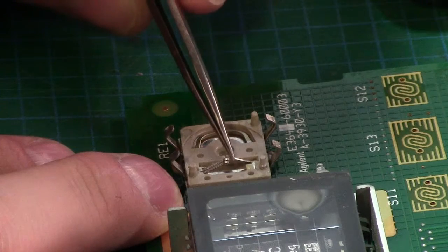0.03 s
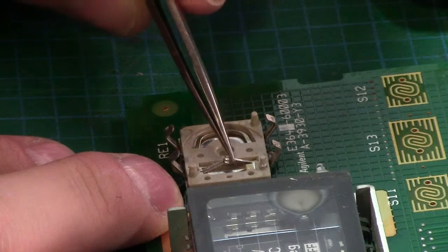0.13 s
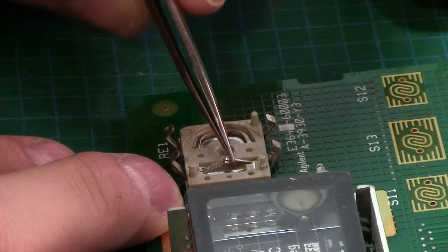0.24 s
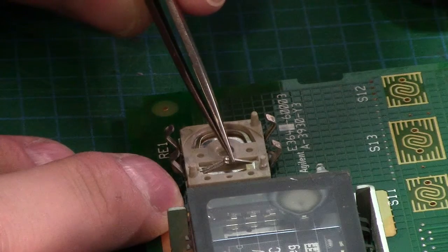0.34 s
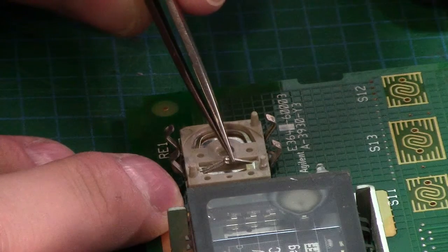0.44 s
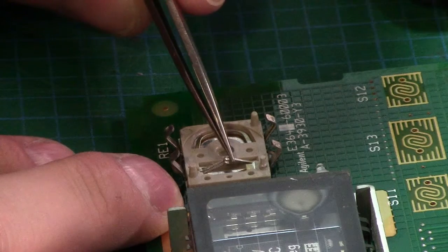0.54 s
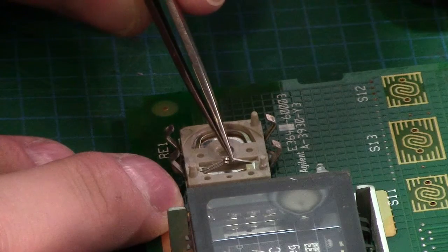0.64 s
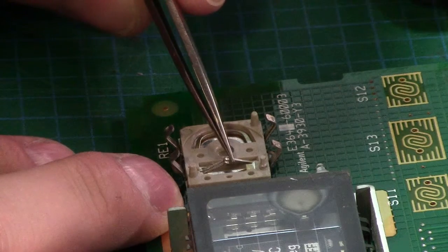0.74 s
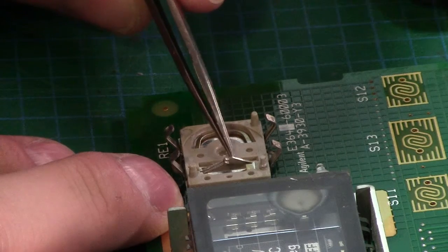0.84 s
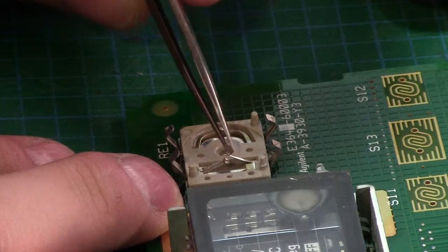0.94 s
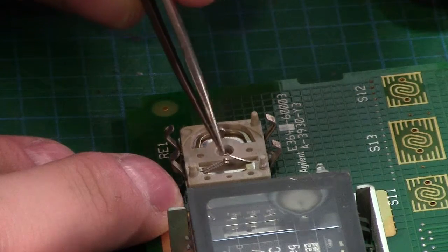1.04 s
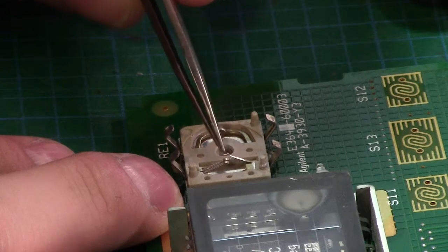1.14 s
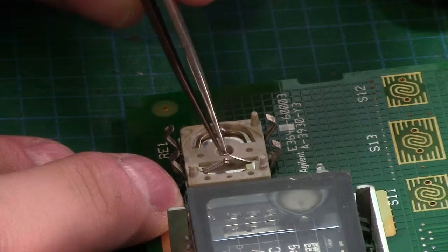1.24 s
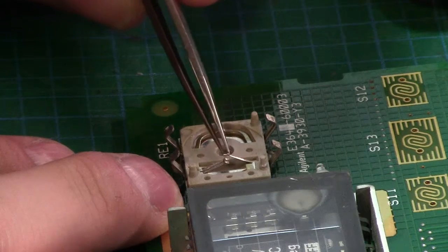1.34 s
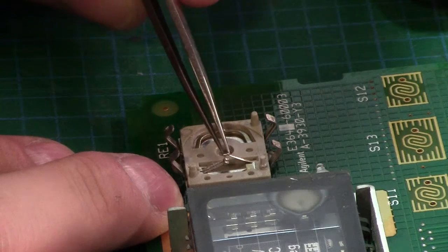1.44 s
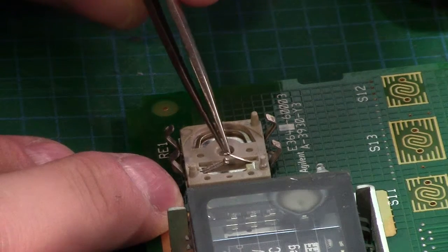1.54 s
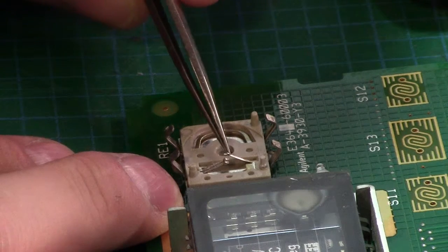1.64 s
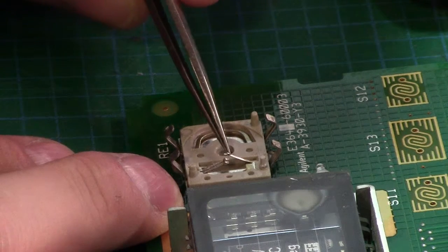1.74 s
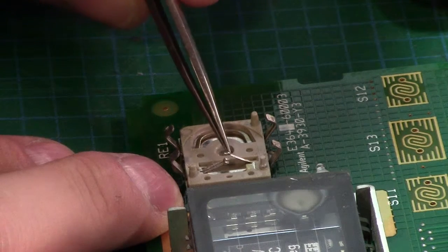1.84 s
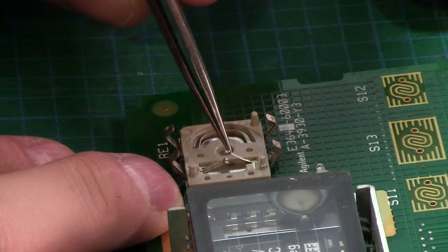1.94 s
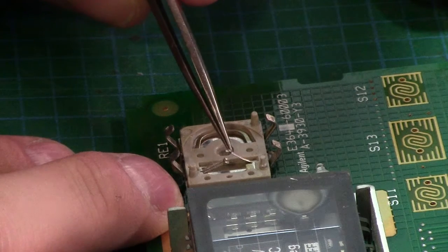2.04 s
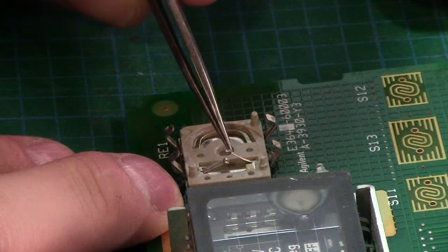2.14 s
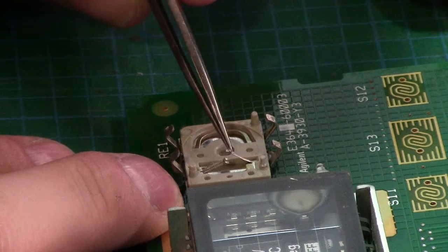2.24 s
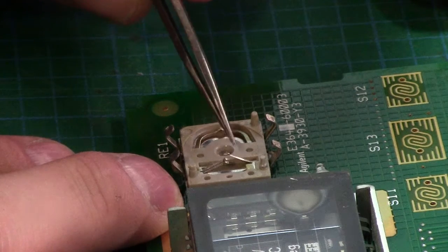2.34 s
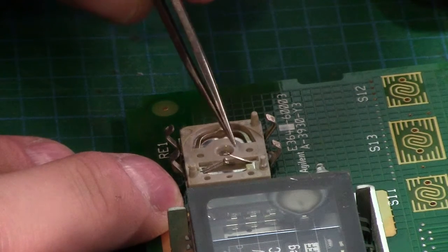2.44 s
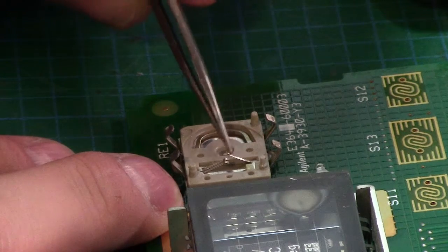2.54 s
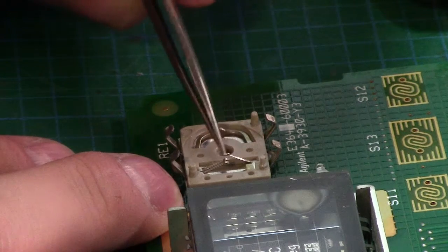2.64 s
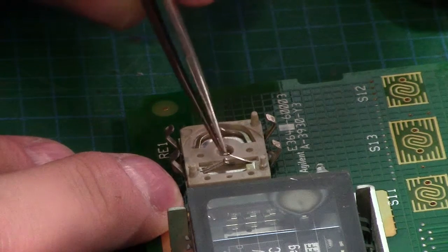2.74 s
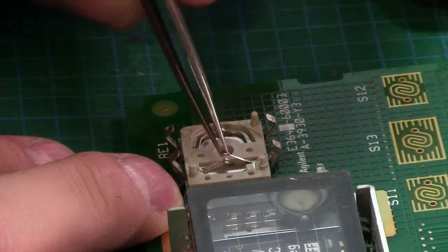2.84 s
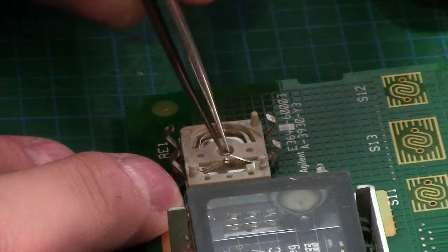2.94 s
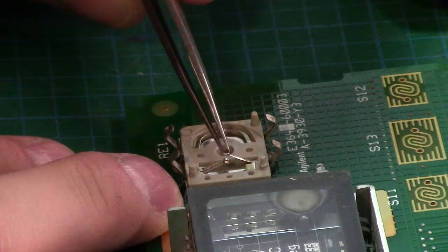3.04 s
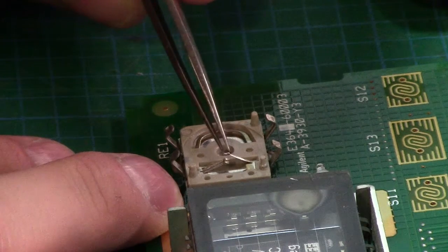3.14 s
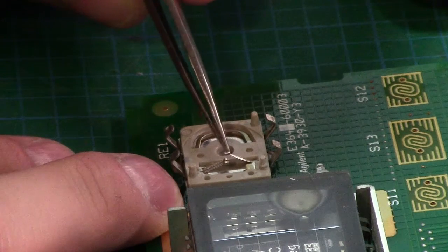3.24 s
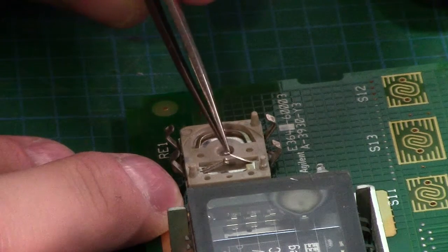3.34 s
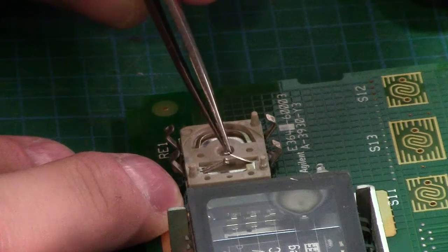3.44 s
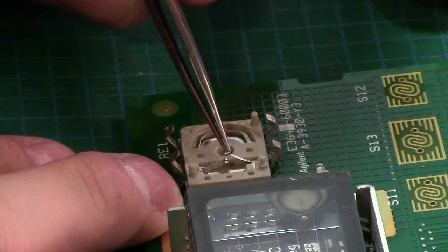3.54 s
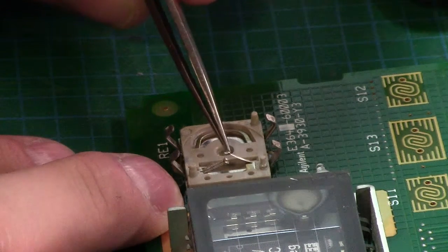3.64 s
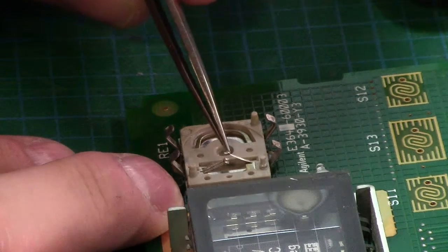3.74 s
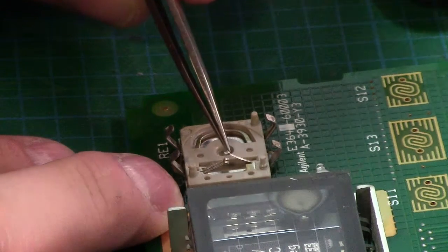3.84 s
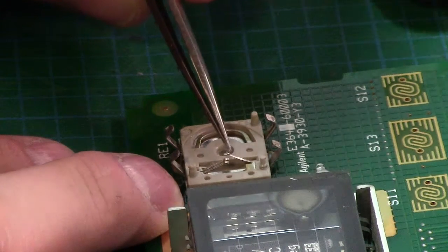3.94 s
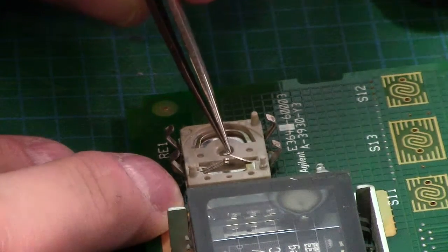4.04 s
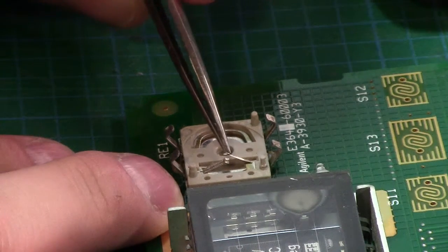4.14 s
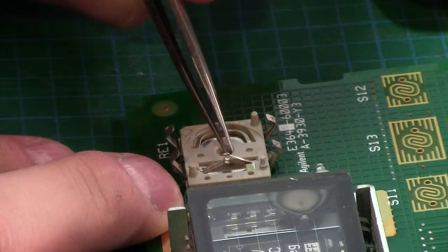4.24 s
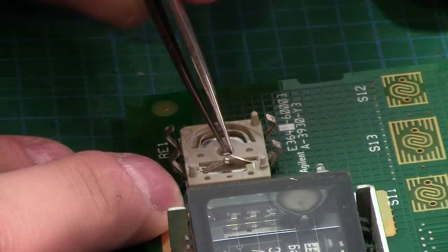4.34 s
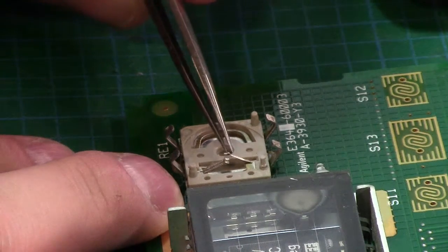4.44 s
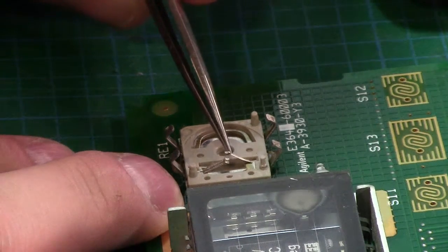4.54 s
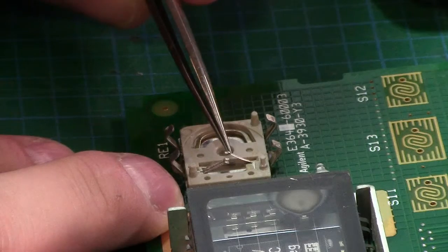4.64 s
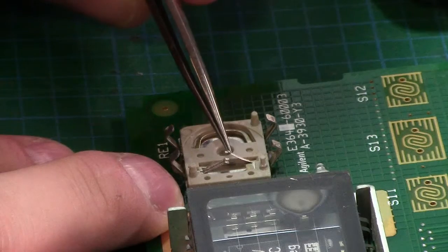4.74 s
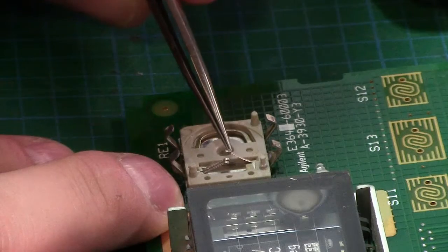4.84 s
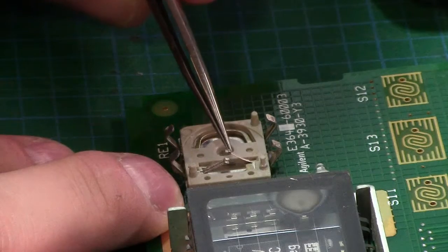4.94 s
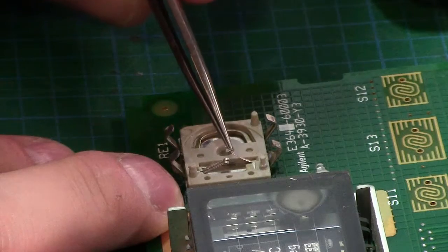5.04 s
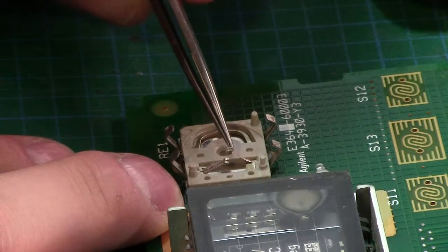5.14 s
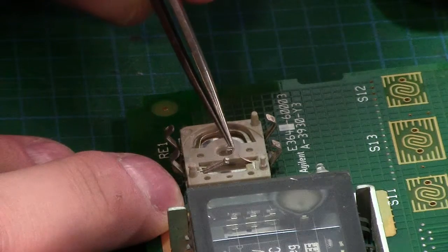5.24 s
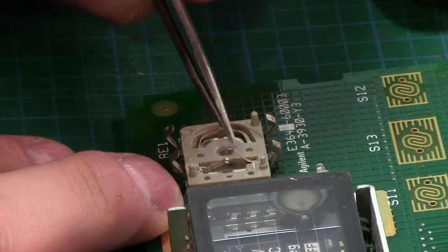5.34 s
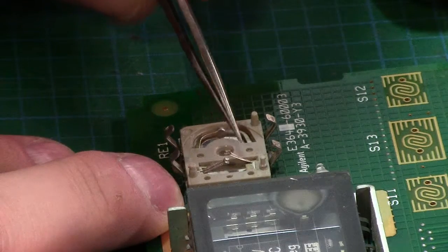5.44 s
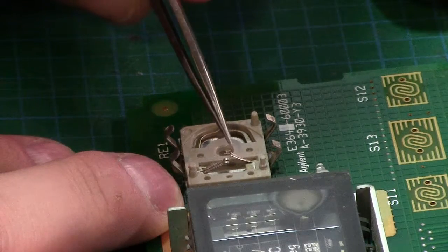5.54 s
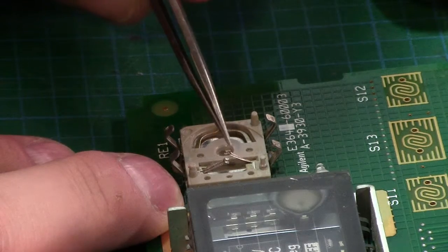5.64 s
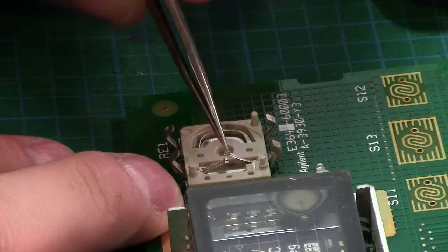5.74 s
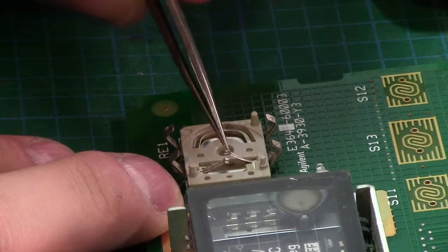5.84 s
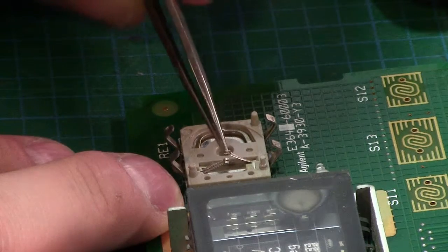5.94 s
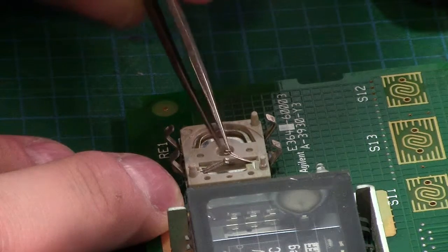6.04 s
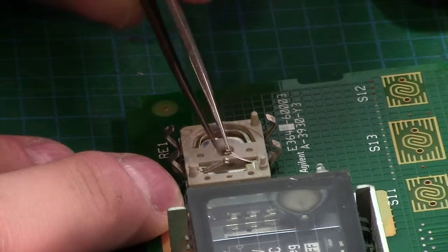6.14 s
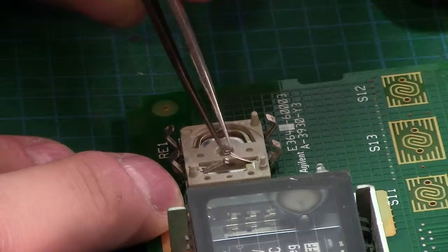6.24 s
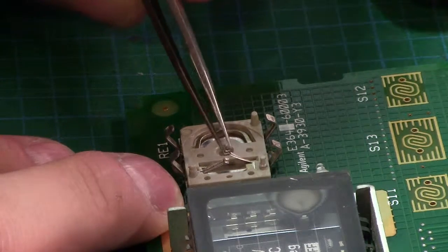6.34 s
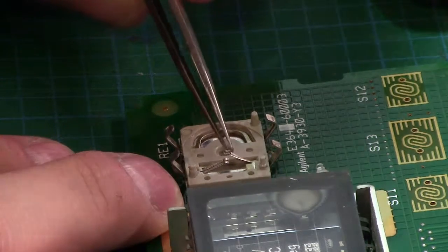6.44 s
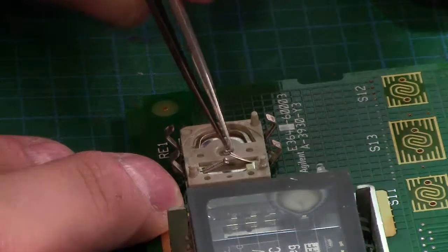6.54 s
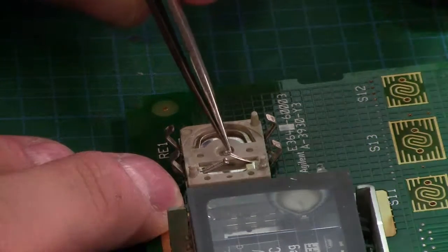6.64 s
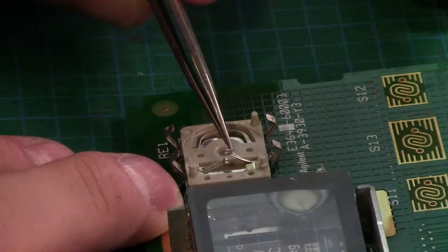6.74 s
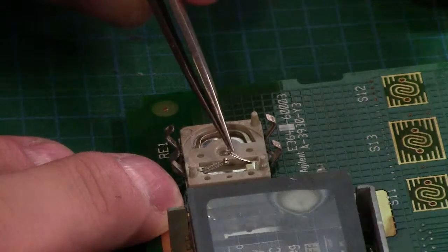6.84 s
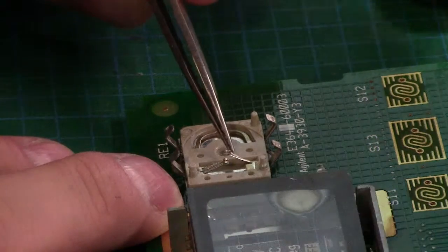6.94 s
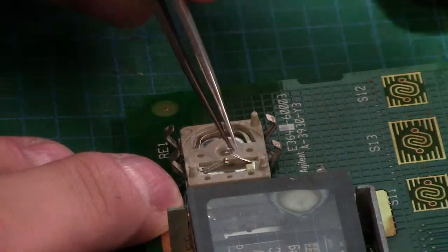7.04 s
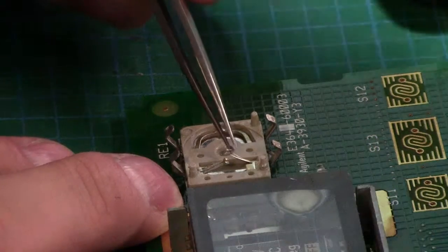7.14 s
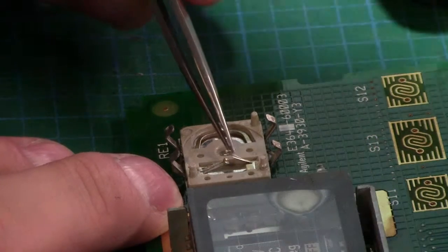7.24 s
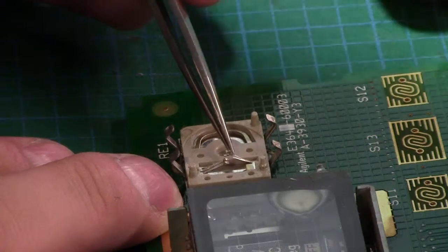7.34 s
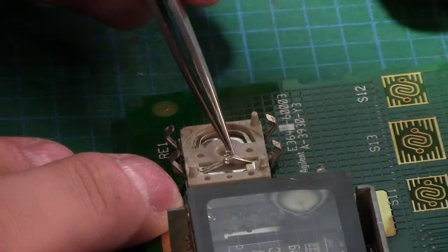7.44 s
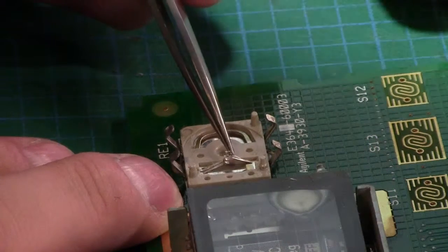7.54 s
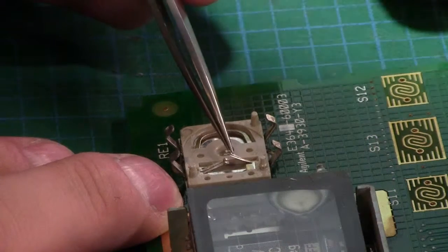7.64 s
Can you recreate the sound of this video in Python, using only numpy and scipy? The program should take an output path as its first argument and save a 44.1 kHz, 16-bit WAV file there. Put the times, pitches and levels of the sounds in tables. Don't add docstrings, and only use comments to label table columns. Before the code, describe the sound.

Very close in a small room, fine steel tweezers work at tiny contact springs on a circuit board. After a second of steady fan hum come faint ticks, then a hard, bright snap with a quick rebound, a smaller click, scattered tiny touches, another loud snap as the spring comes free, and finally a weak slanting click.

```python
import sys
import numpy as np
from scipy import signal
from scipy.io import wavfile
from scipy.ndimage import uniform_filter1d

SR = 44100
rng = np.random.default_rng(int(sys.argv[2]) if len(sys.argv) > 2 else 0)


def unload_audio(sound):
    columns = np.transpose(np.atleast_2d(sound))
    steps = np.round(np.clip(columns, -1, 1) * 32767)
    wavfile.write(sys.argv[1], SR, steps.astype(np.int16))


def magnitude_from_level(level_db):
    exponent = np.asarray(level_db, float) / 20
    return 10 ** exponent


N = 339248

# frequency in Hz, width in Hz,
# level in the snap in dB, level of the ring-on under the snap in dB.
FREE = [(2174, 91, -18, -43.5), (2700, 640, -15.5, -48), (3420, 300, -14, -47), (4400, 600, -13, -46),
        (5190, 220, -7.5, -38), (6260, 200, -13, -64.5), (7200, 380, -8.5, -54), (8700, 340, -8, -60),
        (10020, 430, 0.5, -46), (12660, 220, -6, -50), (13500, 350, -17, -60), (14400, 380, -19, -56),
        (15620, 300, -30, -41)]
REBOUND = [(3260, 1100, -8, -50), (5220, 260, -6, -32), (6800, 210, -3, -38), (8450, 450, -8, -50),
           (10500, 700, -6, -38), (12300, 350, 0, -45)]
HELD = [(2280, 720, -22.5, -30), (4400, 300, -17, -50), (5130, 270, -17.5, -50), (6050, 220, -12, -50),
        (6660, 180, -12.5, -50), (8250, 340, -5.5, -36), (9200, 600, -4, -50), (10150, 230, -5, -42),
        (11060, 440, -5, -50), (12500, 330, -22, -55), (13700, 350, -15, -55), (14600, 450, -6, -40),
        (15800, 400, -16, -50)]
SLANT = [(2230, 390, -11, -35), (3580, 240, -8, -18), (4380, 220, -6, -45), (5300, 220, -3.5, -37),
         (6100, 290, -1, -47), (7200, 300, -2, -36), (8500, 190, -6, -50), (10400, 340, 7, -36),
         (13700, 550, -6, -40)]
FLICK = [(2050, 190, -23.5, -57), (3470, 320, -12.5, -56), (4050, 280, -12.5, -60), (5040, 340, -17.5, -46),
         (7200, 150, -8, -55), (9730, 380, -2.5, -47), (11300, 480, -10, -58), (12600, 320, -1, -42),
         (14130, 350, -10, -55), (15660, 500, -4.5, -44)]


def snaps(beat_hz=55.4, treble_loss=0.2, twin=0.79):
    # start in seconds, peak in dB, modes of the grip, broad crack in dB, ring-on t60 in seconds.
    strong_slips = [
        (2.3073, -3, FLICK, -9, .36),
        (2.3177, -13.5, REBOUND, -4.5, 0.097),
        (2.3215, -20, REBOUND, -1, .18),
        (2.9269, -17.5, HELD, -7, 0.11),
        (5.4006, -2.5, FREE, -1, 0.23),
        (6.2262, -21.5, SLANT, -7, .16),
    ]
    quickest_ms, slower_ms_per_db = 0.092, 0.04
    out = np.zeros(N)
    t = np.arange(12000)[:, None] / SR
    for start, peak_db, grip, crack_db, t60 in strong_slips:
        hz, width, mode_db, arm_db = np.transpose(grip)
        rise_ms = quickest_ms + slower_ms_per_db * abs(crack_db)
        body = rings(hz, width, mode_db, rise_ms, size=1500)
        add(body, rise_ms / 1000, magnitude_from_level(crack_db) * crack())
        force = slip(2.1, size=300)
        add(out, start, magnitude_from_level(peak_db) * peaked(np.convolve(force, body)))

        apart_hz = beat_hz * np.sqrt(hz / 5000)
        arm = np.sin(2 * np.pi * hz * t)
        other_arm = -twin * np.sin(2 * np.pi * (hz - apart_hz) * t)
        spring = 0.35 * twin * np.sin(2 * np.pi * (hz + 1.7 * apart_hz) * t)
        fade_db = -60 * t / t60 * (hz / 5000) ** treble_loss
        ring_on = magnitude_from_level(peak_db + arm_db + fade_db) * (arm + other_arm + spring)
        fade_in = np.minimum(t[:, 0] / 0.0018, 1)
        add(out, start, ring_on.sum(axis=1) * fade_in)
    return out


def ticks(width=300.0, rise_ms=.25, spring_db=4.0, crack_db=9.5):
    # start in seconds, peak in dB, tip ring in Hz, spring and crack in dB.
    touches = [(1.04, -44, 9250, -14), (1.0499, -38, 9200, -8), (1.054, -28, 9200, 0),
               (1.0558, -32, 6150, -11), (1.068, -42, 11000, -8), (1.082, -41, 10000, -8),
               (1.0955, -39, 11000, -2), (1.0553, -35, 13500, -3), (1.457, -37, 11000, -2),
               (1.4575, -40, 6250, -8), (2.3, -38, 9200, 1), (3.066, -46, 9600, -14),
               (3.0695, -48, 9500, -8), (3.0937, -32, 9500, -12), (3.094, -38, 6300, -16),
               (3.107, -48, 6400, -3), (3.39, -48, 8000, -1), (3.4072, -40.5, 10600, -7),
               (3.533, -42, 9900, -6), (3.555, -35.5, 9900, -3), (3.5575, -40, 7500, -4),
               (3.565, -50, 7460, -16), (3.9434, -28.5, 10600, -11), (3.9449, -35, 6200, -17),
               (3.9443, -34.5, 5300, -13), (3.945, -40, 4300, -10), (5.3985, -31, 7140, 0),
               (5.83, -47, 9000, -2), (7.074, -43, 6400, -18)]
    out = np.zeros(N)
    hz, spring_width, mode_db, _ = np.transpose(HELD)
    spring = rings(hz, spring_width, mode_db, rise_ms, size=600)
    for start, peak_db, tip_hz, broad_db in touches:
        tip = rings(np.array([tip_hz]), width, 0, rise_ms, size=600)
        body = tip + magnitude_from_level(broad_db + spring_db) * spring
        add(body, rise_ms / 1000, magnitude_from_level(broad_db + crack_db) * crack())
        force = slip(0.89, size=200)
        add(out, start, magnitude_from_level(peak_db) * peaked(np.convolve(force, body)))
    return out


def slip(fade_ms, size):
    ms = np.arange(size) / SR * 1000
    force = 0.019 * rng.standard_normal(size) * np.exp(-ms / fade_ms)
    force[0] = 1
    return force


def rings(hz, width, db, rise_ms, size):
    t = np.arange(size)[:, None] / SR
    decay = np.exp(-np.pi * width * t)
    modes = magnitude_from_level(db) * width * decay * np.sin(2 * np.pi * hz * t)
    build_up = (1 - np.exp(-1000 * t[:, 0] / rise_ms)) ** 2
    return peaked(modes.sum(axis=1) * build_up)


def crack():
    # frequency in Hz, level in dB.
    spectrum = [(900, -48), (1600, -8), (2200, 0.5), (3500, -1), (8000, -3), (14500, -0.5), (17000, -21)]
    hz = abs(np.fft.fftfreq(1024, 1 / SR))
    log_gain = np.log(magnitude_from_level(read(spectrum, hz)))
    response = np.exp(np.conj(signal.hilbert(log_gain)))
    return peaked(np.fft.ifft(response).real[:256])


def room(x, early_db=4., early_t60=0.041):
    # frequency in Hz, t60 in seconds.
    decay_times = [(1500, 0.19), (3000, 0.26), (6000, 0.3), (10000, 0.23), (16000, 0.15)]
    size = SR // 2
    taps = np.zeros(size)
    at = np.arange(90, size - 12, 12)
    taps[at + rng.integers(0, 12, len(at))] = rng.choice([-1., 1.], len(at))
    hz, t, bands = signal.stft(taps, SR, nperseg=128)
    late = magnitude_from_level(-60 * t / read(decay_times, hz)[:, None])
    early = magnitude_from_level(early_db - 60 * t / early_t60)
    tail = signal.istft(bands * (late + early), SR, nperseg=128)[1]
    return signal.fftconvolve(x, tail / np.linalg.norm(tail))[:N]


def hum(patchy_db=0.69, swell_db=0.25):
    # frequency in Hz, level in dB per Hz.
    air = [(25, -50), (39, -3), (95, -11.5), (350, -16.5), (1200, -20), (1400, -25), (4280, -34),
           (16000, -45.5)]
    # frequency in Hz, width in Hz, lift above the air
    # noise in dB.
    resonances = [(44, 29, 6), (71.6, 10.4, 0.5), (125.9, 22.7, 10.5), (148, 8.6, 3.5), (206.4, 24, 5),
                  (254, 58, 4),
                  (471.4, 50, 5.5), (557, 17.5, 6.5), (624, 23, 2.5), (726, 20.6, 9.5), (775.4, 14, 7.5),
               (818, 21.6, 8.5), (835, 30, 5.5), (1023, 33, 8.5), (1102.5, 13, 8), (1128.6, 18, 9),
               (1786, 136, 3.5), (2120, 960, 4)]
    frames = N // 1024 + 5
    hz = np.fft.rfftfreq(4096, 1 / SR)
    real, imag, patches = rng.standard_normal((frames, 2049, 3)).T
    patches = uniform_filter1d(patches, size=30, axis=0)
    patches = uniform_filter1d(patches, size=4, axis=1)
    swell = uniform_filter1d(rng.standard_normal(frames), size=8)

    lift_db = sum(db / (1 + (2 * (hz - f) / w) ** 2) for f, w, db in resonances)
    level_db = (read(air, hz) + lift_db)[:, None]
    level_db = level_db + patchy_db * patches / patches.std() + swell_db * swell / swell.std()
    noise = signal.istft((real + 1j * imag) * magnitude_from_level(level_db), nperseg=4096, noverlap=3072)[1][:N]
    return magnitude_from_level(-42.5) * noise / noise.std()


def read(points, hz):
    f, value = np.transpose(points)
    return np.interp(np.log(hz + 1), np.log(f + 1), value)


def add(mix, start, sound):
    part = mix[round(start * SR):][:len(sound)]
    part += sound[:len(part)]


def peaked(x):
    return x / np.max(abs(x))


def scene():
    strong = snaps()
    faint = ticks()
    echo = room(magnitude_from_level(-7) * strong + magnitude_from_level(-6) * faint)
    return (strong + faint + echo + hum())[None]


def roll_off(x):
    return signal.sosfilt(signal.butter(12, 16970, fs=SR, output="sos"), x)


def record(dry):
    low_pass = signal.firwin(767, 15880, window=("kaiser", 7), fs=SR)
    limited = signal.oaconvolve(dry, low_pass[None], "same")
    return roll_off(limited + 0.0142)


dry = scene()
out = record(dry)
unload_audio(out)
```